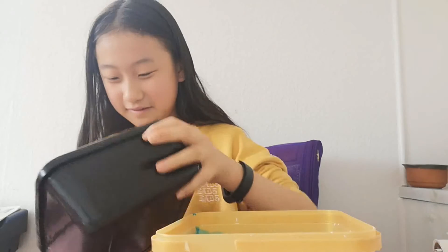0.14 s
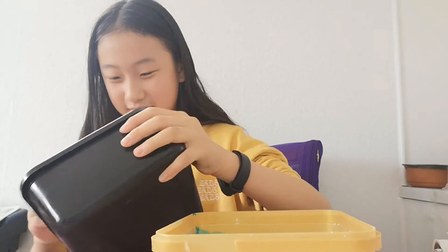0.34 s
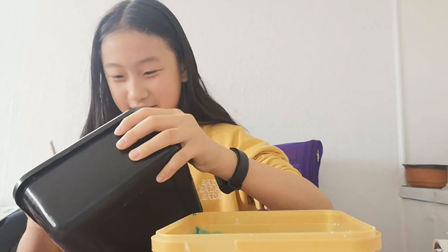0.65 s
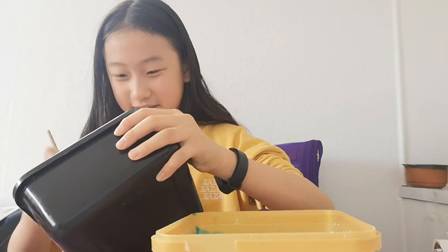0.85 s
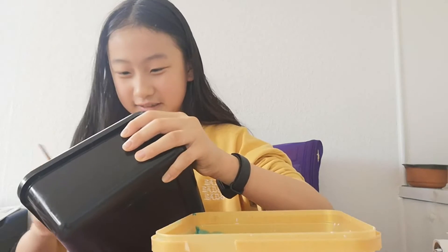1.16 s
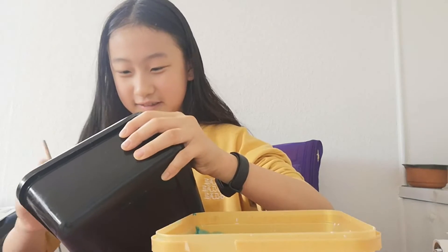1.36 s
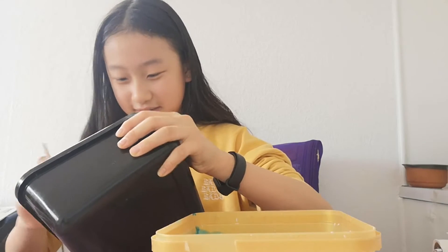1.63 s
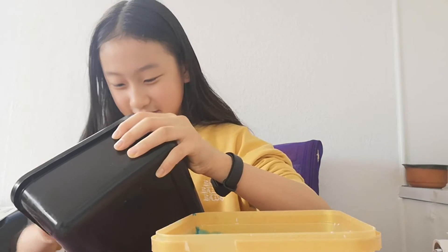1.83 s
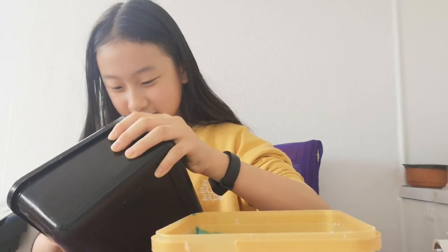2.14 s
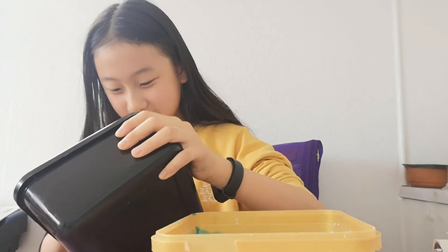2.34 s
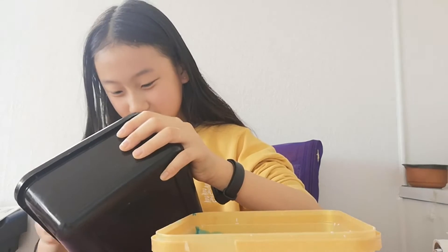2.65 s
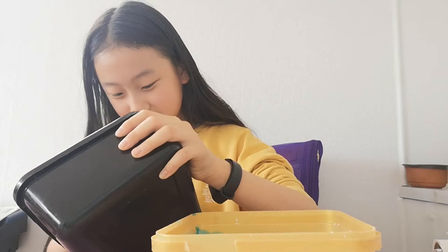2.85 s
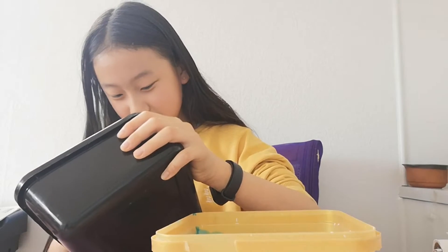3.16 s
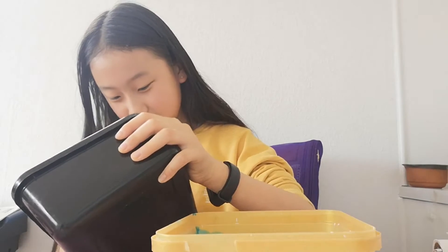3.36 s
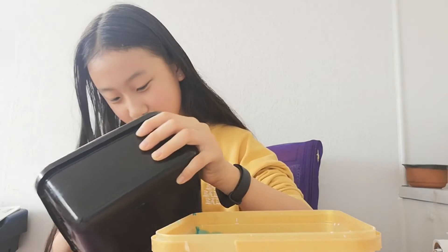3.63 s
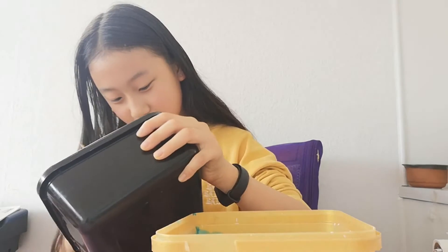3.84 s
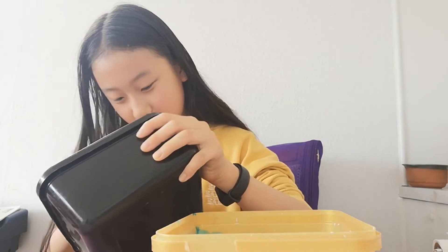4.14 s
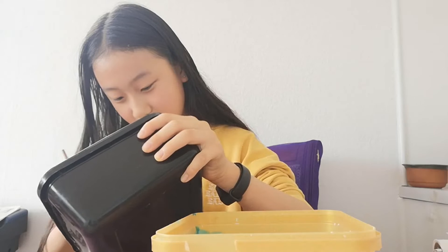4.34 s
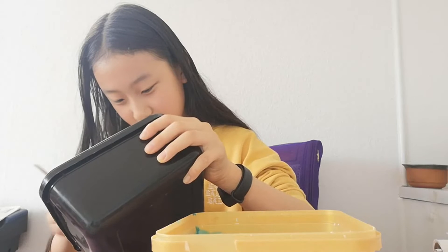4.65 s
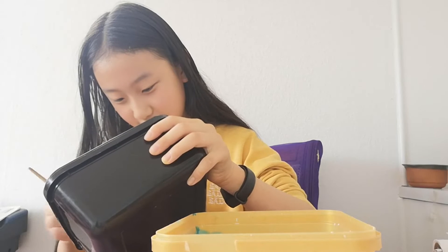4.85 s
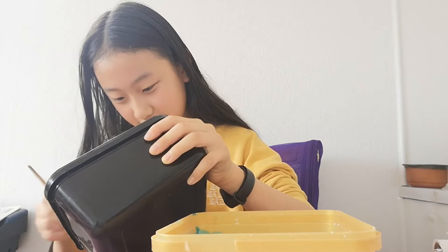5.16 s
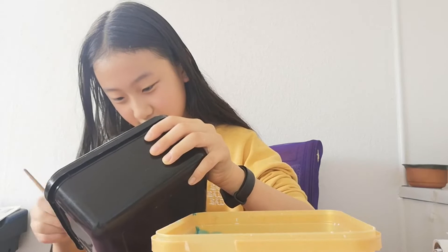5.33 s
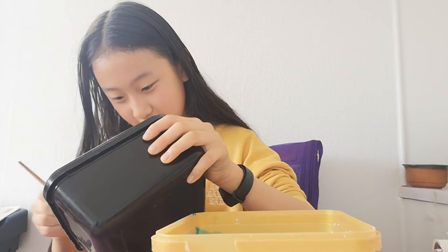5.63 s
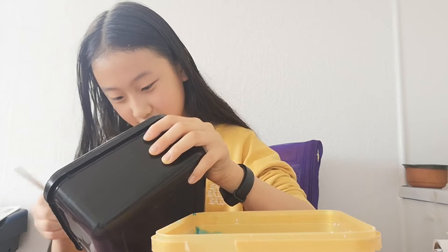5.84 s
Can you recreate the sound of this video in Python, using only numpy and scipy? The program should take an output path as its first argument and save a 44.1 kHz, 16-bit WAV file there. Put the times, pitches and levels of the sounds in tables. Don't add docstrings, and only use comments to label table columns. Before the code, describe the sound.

Close stereo pickup on a table in a small bare room. Chopsticks touch a tilted plastic tub faintly, then knock firmly with hollow clacks and low thuds. After a weak, sparse stretch around four seconds, quicker and stronger strokes close the scene. A low compressor hum and soft room hush continue underneath.

```python
import sys
import numpy as np
from scipy import signal
from scipy.fft import rfft, irfft, next_fast_len
from scipy.io import wavfile
from scipy.ndimage import uniform_filter1d, map_coordinates

SR = 44100
rng = np.random.default_rng(int(sys.argv[2]) if len(sys.argv) > 2 else 0)


def generate_wav(signal):
    frames = np.transpose(np.atleast_2d(signal))
    scaled = np.clip(frames, -1, 1) * 32767
    pcm = np.round(scaled).astype(np.int16)
    wavfile.write(sys.argv[1], SR, pcm)


def magnitude_from_level(level_db):
    exponent = np.asarray(level_db, float) / 20
    return 10 ** exponent


N = 264203


def unit(x):
    return x / np.sqrt(np.mean(x ** 2) + 1e-20)


def along(points, hz):
    point_hz, value = np.transpose(points)
    return np.interp(np.log(hz + 1), np.log(point_hz + 1), value)


def curves(rows):
    time_s, *columns = np.transpose(rows)
    return [np.interp(np.arange(N) / SR, time_s, column) for column in columns]


def wobble(rate):
    knots = rng.standard_normal(int(N * rate / SR) + 4)
    return map_coordinates(knots, [np.arange(N) * rate / SR])


def filtered(x, response):
    size = next_fast_len(N + SR // 4)
    hz = np.fft.rfftfreq(size, 1 / SR)
    return irfft(rfft(x, size) * response(hz), size)[..., :N]


# pitch_hz, likeness (1 = the same, negative = opposed)
ALIKE = [(60, 0.99), (110, 0.92), (200, 0.9), (380, 0.2), (700, -0.46), (1290, 0.18), (2380, 0.13),
         (4400, -0.22), (8120, -0.071), (15000, -0.32)]


def paired(two, hz):
    turn = np.arccos(np.clip(along(ALIKE, hz), -1, 1)) / 2
    mid, side = two[0] * np.cos(turn), two[1] * np.sin(turn)
    return np.array([mid + side, mid - side])


# pitch_hz, level_db (per Hz)
HUSH_COLOUR = [(45, -16), (61, -3), (80, -15.5), (199, -14.5), (295, -22.5), (545, -27), (678, -32),
               (1810, -26.5), (2570, -28.5), (4160, -36.5), (5400, -36.5), (8360, -43.5), (14800, -47),
               (15800, -57)]
# pitch_hz, left_over_right_db
AIR_LEAN = [(300, 0), (1500, .8), (8000, 2.6)]
# time_s, hum_pitch_hz, hum_level_db, hush_level_db
AIR_CHANGES = [(0.0, 47.5, -65.5, -72.5), (0.13, 48.15, -62.5, -75.5), (5.99, 49.8, -61.5, -75.5)]
# multiple of the hum pitch, level_db
HUM = [(1, 7), (2, -20.5), (3, -24), (4, -14), (5, -31), (9, -38.5), (11, -30.5)]
# pitch_hz, level_db (rms)
WHINE = [(5443, -103), (9808, -99)]


def hush():
    hum_hz, hum_db, hush_db = curves(AIR_CHANGES)
    grid = signal.stft(rng.standard_normal((2, N)), nperseg=512)[2]
    patches = uniform_filter1d(rng.standard_normal(grid.shape[1:]), 6, 0)
    patches = uniform_filter1d(patches, 14, 1)
    patchy = signal.istft(grid * magnitude_from_level(2.2 * unit(patches)), nperseg=512)[1][:, :N]
    f = np.fft.rfftfreq(N, 1 / SR)
    lean = magnitude_from_level(np.outer([.5, -.5], along(AIR_LEAN, f)))
    air = irfft(paired(rfft(patchy) * magnitude_from_level(along(HUSH_COLOUR, f)), f) * lean, N)
    air = air / np.std(filtered(air[0], lambda hz: (hz > 250) & (hz < 8000)))
    turn = 2 * np.pi * np.cumsum(hum_hz + 0.25 * wobble(6)) / SR
    hum = sum(magnitude_from_level(db + (1.3 + 0.26 * k) * wobble(9)) * np.sin(k * turn + k * k) for k, db in HUM)
    t = np.arange(N) / SR
    whine = sum(magnitude_from_level(db + 0.83 * wobble(1.9)) * np.sin(2 * np.pi * hz * t + 1.7 * wobble(25))
                for hz, db in WHINE)
    return magnitude_from_level(hush_db + 4.0) * air + np.sqrt(2) * (magnitude_from_level(hum_db) * hum + whine)


# pitch_hz, level_db (per Hz)
RUMBLE = [(18, -31), (26, 4.5), (40, 6), (49, 2), (62, -3), (72, -12.5), (90, -46)]


def building():
    return magnitude_from_level(-68.5) * unit(filtered(rng.standard_normal(N), lambda hz: magnitude_from_level(along(RUMBLE, hz))))


# pitch_hz, time_s
ROOM_DECAY = [(100, 0.069), (500, 0.38), (1500, 0.29), (4000, 0.38), (12000, 0.58)]
# pitch_hz, level_db
ROOM_LEVEL = [(60, -23), (200, -1), (700, -9), (1500, -4.5), (3000, -2), (8000, 2), (15000, -3.5)]


def room(size, gap):
    hz, t, grid = signal.stft(rng.standard_normal((2, size)), SR, nperseg=256)
    fading = grid * magnitude_from_level(-60 * t / along(ROOM_DECAY, hz)[:, None])
    tail = signal.istft(fading, SR, nperseg=256)[1][:, :size]
    swell = np.clip(np.arange(size) / SR / gap - .4, 0, 1) ** 2
    tail = tail * swell * np.linspace(1, 0, size) ** .5
    f = np.fft.rfftfreq(size, 1 / SR)
    return paired(rfft(tail / np.linalg.norm(tail[0])), f) * magnitude_from_level(along(ROOM_LEVEL, f))


def ring(modes, f, luck, detune):
    out = 0
    for k, (hz, width, db) in enumerate(modes):
        centre = hz * (1 + detune * luck[k, 0])
        resonance = 1j * f * width / (centre * centre - f * f + 1j * f * width)
        out = out + (-1) ** k * magnitude_from_level(db + 1.9 * luck[k, 1]) * resonance
    out = out * (1j * f / (1j * f + .5 * modes[0][0])) ** 2
    contact = (1 + 1j * f / (2.87 * hz)) ** 4
    return out * SR / (2 * np.pi * modes[0][1]) / contact


# pitch_hz, left_over_right_db
PORT_SHADE = [(350, 0), (520, 2), (720, 8), (850, 12), (1000, 6), (1370, 5), (1600, 1), (2200, -1),
              (2900, 5), (4200, -3), (6800, 4), (9000, -1)]
# pitch_hz, lead_rad
PORT_LEAD = [(150, 0), (380, 1), (600, 2.8), (720, 3.2), (850, 5.1), (1000, 6.5), (1900, 6.6), (2600, 7.9),
             (3600, 7.7), (5000, 9.7), (8000, 12.4), (11000, 13)]
# pitch_hz, late_s
TABLE_TRAVEL = [(60, .009), (110, .007), (200, 0), (500, .0006), (1000, 0)]
# late_s, level_db
ECHOES = [(.0065, -13), (0.0132, -15), (.021, -33), (.031, -21.5)]


def blows(times, levels_db, spots, families, tails, grit_s):
    size, lead_in = 2 * tails.shape[-1] - 2, 512
    f = np.fft.rfftfreq(size, 1 / SR)
    sides = np.array([[.5], [-.5]])
    ports = magnitude_from_level(sides * along(PORT_SHADE, f)) * np.exp(1j * sides * along(PORT_LEAD, f))
    travel = np.exp(-2j * np.pi * np.cumsum(along(TABLE_TRAVEL, f)) * f[1])
    echoes = sum(magnitude_from_level(db) * np.exp(-2j * np.pi * f * late) for late, db in ECHOES)
    echoes = echoes / (1 + 1j * f / 1800) ** 2
    onset = np.clip((np.arange(size) - lead_in) / (.0005 * SR) + 1.8, 0, 1)
    out = np.zeros((2, N + size + lead_in))
    for k, (s, row_db, spot) in enumerate(zip(np.ravel(times), levels_db, spots)):
        luck = rng.standard_normal((5, 4, 2))
        bent = f * (1 + 0.0071 * spot)
        body = sum(magnitude_from_level(db) * ring(modes, bent, chance, detune=0.038)
                   for modes, db, chance in zip(families, row_db, luck))
        if grit_s:
            chatter = rng.standard_normal((2, 800)) * magnitude_from_level(-60 * np.arange(800) / SR / grit_s)
            body = body * np.exp(1j * np.angle(rfft(chatter, size)))
        heard = body * ((travel + echoes) * ports + tails[k % len(tails)])
        delay = np.exp(-2j * np.pi * f * (lead_in + s * SR % 1 + grit_s * SR / 8) / SR)
        out[:, int(s * SR):][:, :size] += irfft(heard * delay, size) * onset
    return out[:, lead_in:N + lead_in]


# start_s, force_db, hand_weight_db, tip_hardness_db, spot (rim -1 to bottom 1)
STROKES = [(0.1288, -52.5, 3.5, 4, 1.8), (.407, -59.5, 8.5, 6, -0.35), (.688, -37, -3.5, -11, 0.13),
           (1.004, -31.5, 0.1, -4, -0.47), (1.378, -29.5, -3, 2.5, -0.84), (1.726, -28.5, -3, 9.5, -1),
           (1.847, -48.5, -29, 3, 0.3), (2.132, -49, 1.5, -7, 0.6), (2.334, -35, -1.5, -1.5, 0.31),
           (2.5429, -28, -2.5, 1.1, 1.1), (2.7273, -32, -0.9, 2, 1.1), (3.1039, -40, 1, -3.5, -0.39),
           (3.4529, -33.5, -2.5, 2, 1.01), (3.6763, -60, 5.2, 9, 1.5), (4.3786, -44, 8, 0.5, 0.029),
           (4.4094, -54, 10.5, 16, .9), (4.6082, -41.5, -8, -5, -0.025), (4.6351, -48, 4.5, -5, 0.83),
           (4.837, -29, 0, -4, -1.38), (5.0529, -30.5, 0.9, -0.5, -0.51), (5.2519, -23, -5.5, -2.5, -1.59),
           (5.4408, -23, 0.7, 4.5, -1.54), (5.631, -25, 1.9, 3.5, -1.67), (5.8321, -25.5, -3.5, -1, -1.29)]
# start_s, force_db, hand_weight_db, tip_hardness_db, spot (rim -1 to bottom 1)
TOUCHES = [(0.0044, -63.5, -2, -4, 1.3), (0.079, -62, -15, -3, 1.3), (0.1165, -53.5, -5, 13.5, .1),
           (0.2867, -62, -5, -5, -0.055), (0.4835, -63, -15, -4, -0.3), (4.235, -73, -5, -10, 0.93),
           (3.936, -77, 19, -5, .1), (4.2104, -66, -18, -14, 1.1), (4.2655, -59, -15, 11, -0.66)]


def contacts():
    return np.transpose(np.vstack([STROKES, TOUCHES]))


def balance(db, spot, tip, answers, hard):
    place = np.c_[np.ones(len(spot)), spot]
    return db[:, None] + place @ np.transpose(answers) + np.outer(tip, hard)


def firmness(force, firm):
    return np.outer(force + 32, firm)


# pitch_hz, width_hz, level_db
SLAP = [(1195, 197.6, -0.78), (1436, 99, 0.91)]
FLOOR = [(565.6, 32.5, 0)]
WALL = [(689, 85, 0.26)]
RIM = [(939, 457, -1.44), (1032, 234, -0.41)]
EDGE = [(1790, 327, 4), (2020, 900, -8)]
# level_db over the force, change_db per unit of spot
KNOCK_ANSWER = [(1.5, 1), (-6.5, 0.4), (3, 5.5), (-1.7, -11), (-1.1, -0.8)]
KNOCK_HARD = [0.089, -0.36, 0.098, -0.22, 0.23]
KNOCK_FIRM = [.2, -0.16, -0.04, -0.2, 0.088]


def sticks(tails):
    s, force, weight, tip, spot = contacts()
    levels = balance(force, spot, tip, KNOCK_ANSWER, KNOCK_HARD) + firmness(force, KNOCK_FIRM)
    return blows(s, levels, spot, (SLAP, FLOOR, WALL, RIM, EDGE), tails, grit_s=0)


# pitch_hz, width_hz, level_db
BOOM = [(187.6, 73, -7.5), (214.2, 58, 2.5)]
BELLY = [(292.5, 52.8, -0.29), (336.7, 67.5, -0.054)]
TABLE = [(105.9, 11.7, 5.5), (138, 45, -22.5)]
LEGS = [(57.5, 28, 10)]
# level_db over the force, change_db per unit of spot
THUD_ANSWER = [(-2, 0.016), (-2, 1.45), (-12.5, 4.35), (-10.5, 3.2)]
THUD_HARD = [-0.029, -0.15, -0.035, -0.12]


def thuds(tails):
    s, force, weight, tip, spot = contacts()
    levels = balance(force + weight, spot, tip, THUD_ANSWER, THUD_HARD)
    return blows(s - .0008, levels, spot, (BOOM, BELLY, TABLE, LEGS), tails, grit_s=0)


# pitch_hz, width_hz, level_db
TICK = [(2920, 1400, 14), (3520, 200, -16)]
CLACK = [(2456, 342, 1.2)]
SNAP = [(4970, 230, 0.0025)]
CRISP = [(7400, 3600, 0)]
FIZZ = [(8950, 1420, -24), (10970, 3900, 23)]
# level_db over the force, change_db per unit of spot
TICK_ANSWER = [(-31.5, 0.8), (-6, -0.8), (-28, 5), (-67, 42), (-50, -0.5)]
TICK_HARD = [-0.064, 0.057, 0.34, .3, -.3]
TICK_FIRM = [0.11, 0.091, -.05, .05, -0.11]


def tips(tails):
    s, force, weight, tip, spot = contacts()
    levels = balance(force + tip, spot, tip, TICK_ANSWER, TICK_HARD) + firmness(force, TICK_FIRM)
    return blows(s - .0002, levels, spot, (TICK, CLACK, SNAP, CRISP, FIZZ), tails, grit_s=0.00595)


# start_s, level_db
GRAZES = [(.0825, -60), (.0895, -60), (.097, -59), (2.702, -48.5), (0.2899, -64), (.4848, -64)]
# pitch_hz, width_hz, level_db
SKIM = [(1490, 100, 2.5)]


def skims(tails):
    start_s, level_db = np.hsplit(np.array(GRAZES), [1])
    return blows(start_s, level_db, np.zeros(len(GRAZES)), [SKIM], tails, grit_s=0)


# start_s, level_db
THREADS = [
    (5.9176, -53),
    (5.929, -62),
]
# level_db of snap, crisp and fizz
THREAD_BALANCE = [-7, -3, -14]


def threads(tails):
    start_s, level_db = np.transpose(THREADS)
    levels = level_db[:, None] + np.array(THREAD_BALANCE)
    return blows(start_s, levels, 0 * level_db, (SNAP, CRISP, FIZZ), tails, grit_s=0.005)


def knocks():
    tails = np.array([room(size=16384, gap=0.0067) for _ in range(7)])
    return sticks(tails) + thuds(tails) + tips(tails) + skims(tails) + threads(tails)


# pitch_hz, level_db (per Hz)
SKIN = [(2060, -34), (3500, 7.5), (4520, -9), (7000, 5.5), (8500, -9), (10900, -8), (14500, -17),
        (15500, -29)]
# start_s, hold_s, level_db
SLIPS = [
    (0.032, 0.27, -79.5),
    (0.098, 0.0092, -79),
    (1.727, 0.01, -79),
    (1.84, 0.01, -77),
    (5.9, 0.0092, -73.5),
]


def fingers():
    grain = magnitude_from_level(5.8 * wobble(260)) * rng.standard_normal((2, N))
    rub = unit(filtered(grain, lambda hz: magnitude_from_level(along(SKIN, hz))))
    t = np.arange(N) / SR
    grip_s, let_go_db_per_s = 0.01, 250
    touch = 0
    for start, hold, db in SLIPS:
        grip = np.clip((t - start) / grip_s, 0, 1)
        let_go_s = np.clip(t - start - grip_s - hold, 0, None)
        touch = touch + grip * magnitude_from_level(db - let_go_db_per_s * let_go_s)
    return rub * touch


def scene():
    return knocks() + hush() + building() + fingers()


def roll_off(x):
    return signal.sosfilt(signal.butter(12, 15500, fs=SR, output="sos"), x)


def record(dry):
    return roll_off(dry)


dry = scene()
out = record(dry)
generate_wav(out)
```